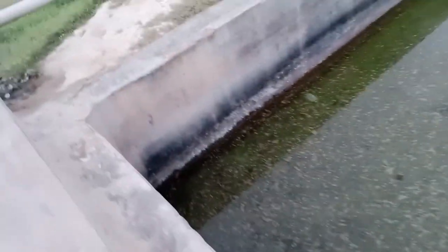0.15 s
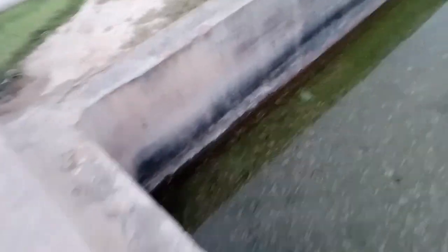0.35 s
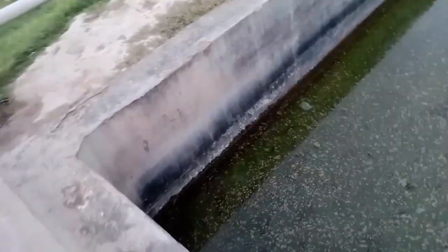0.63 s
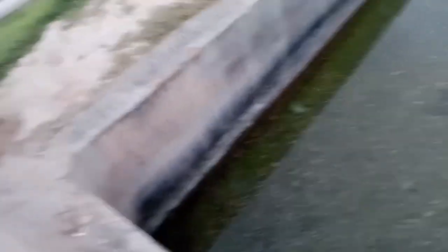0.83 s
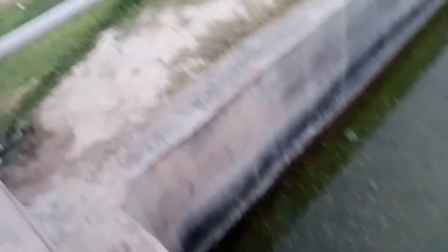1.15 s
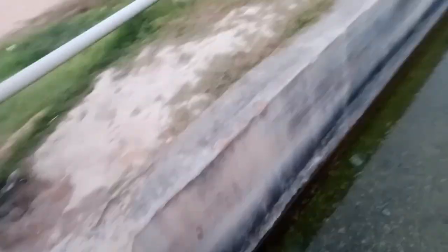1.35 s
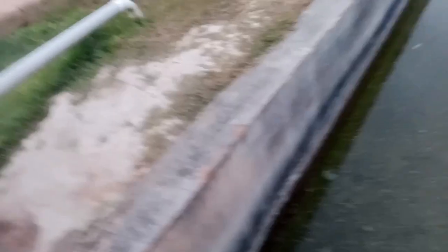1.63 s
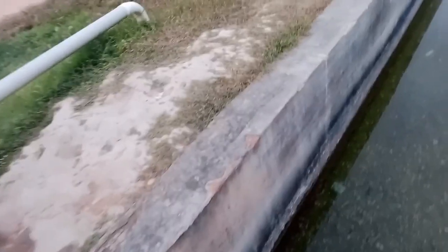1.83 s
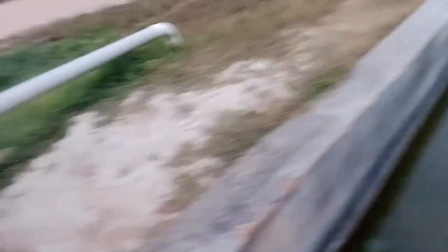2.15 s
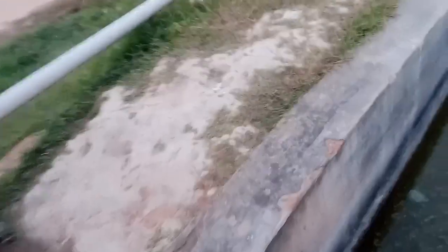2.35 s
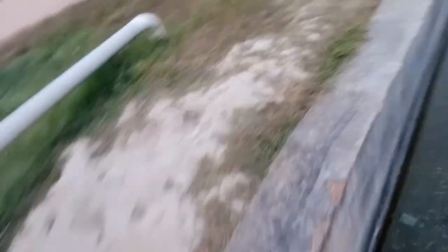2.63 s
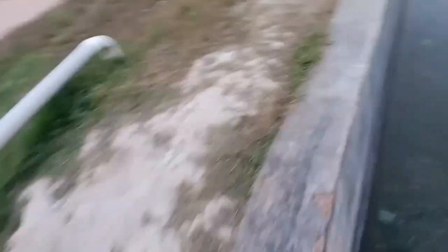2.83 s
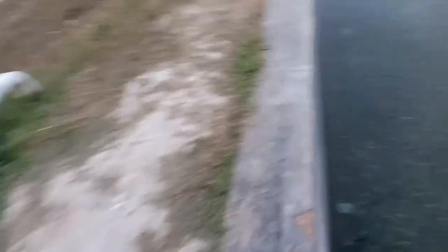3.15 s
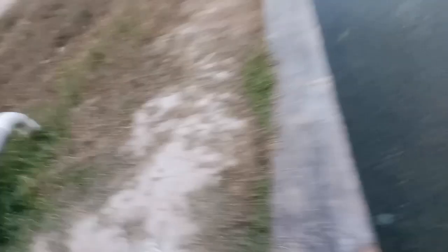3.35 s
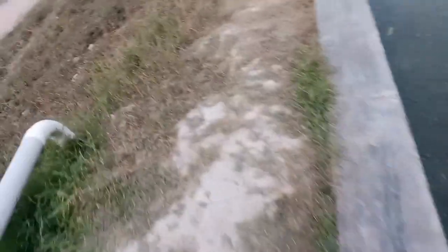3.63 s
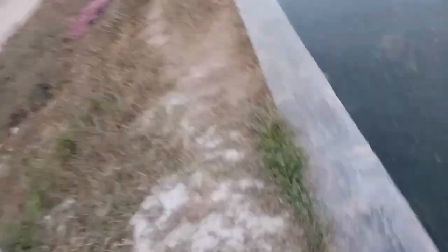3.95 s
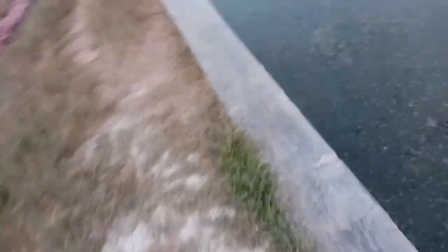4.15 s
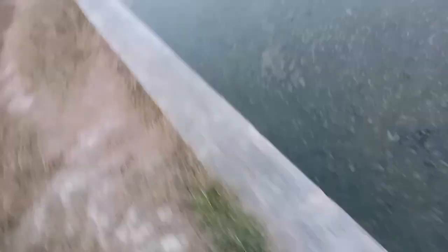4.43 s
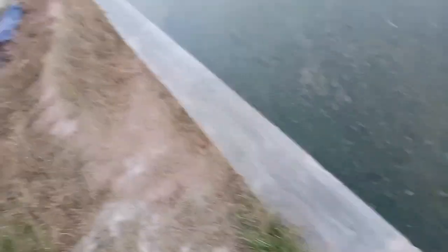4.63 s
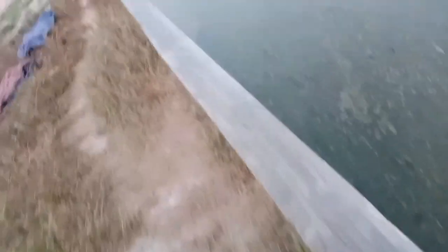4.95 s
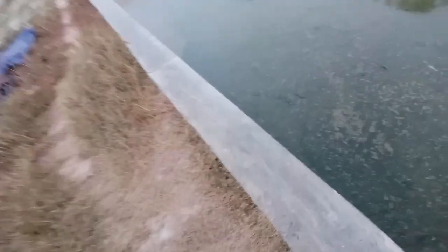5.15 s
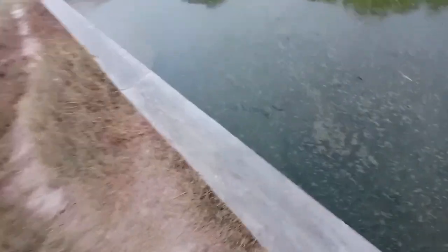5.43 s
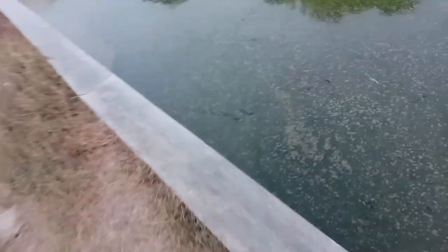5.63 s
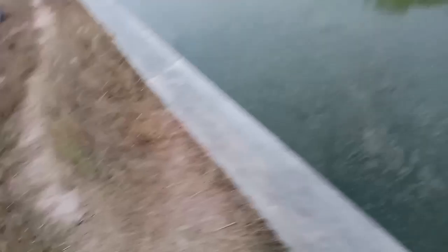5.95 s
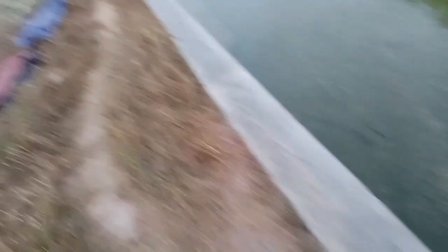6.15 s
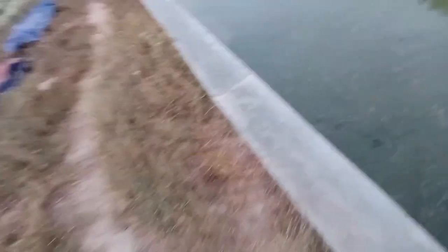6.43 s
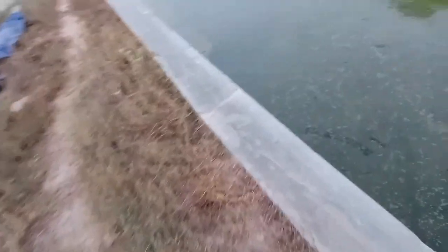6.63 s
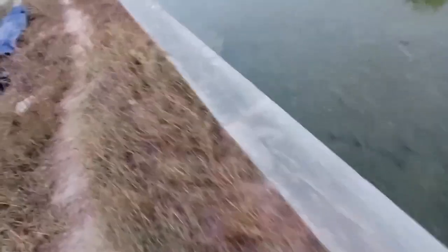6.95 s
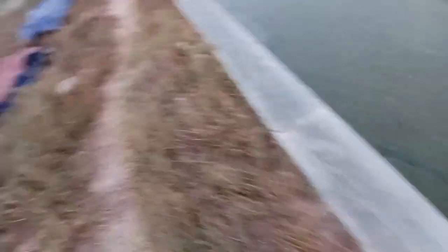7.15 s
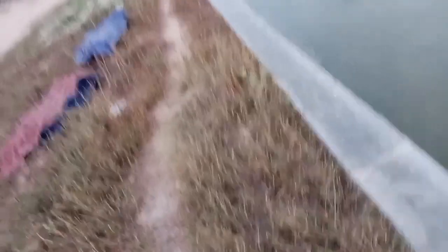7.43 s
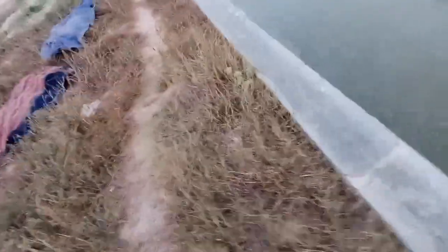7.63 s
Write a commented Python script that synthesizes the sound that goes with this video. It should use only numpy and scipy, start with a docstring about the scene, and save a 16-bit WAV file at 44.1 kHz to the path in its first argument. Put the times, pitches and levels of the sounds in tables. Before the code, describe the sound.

Outdoors by a concrete-edged farm pond, a dense flock of small birds chatters without pause. Water gurgles close by in hollow tones that rise in pitch, with low handling rubs and soft thumps. Near three seconds come sharp knocks, plops and harsh bird rasps. The handheld microphone then turns away, the water fades, and the quieter, duller flock goes on with single chirps, faint high pips and a brief trill.

```python
"""A dense flock of small birds chatters in the trees by a farm pond: many gliding notes, snips and noise wash.
At first water gurgles close by, bubbles and rush in resonances that rise as the microphone moves along a wall.
Rubs of filtered noise, soft ringing thumps and a few knocks come from the hand and the steps; water plops.
Nearer birds rasp, snip and whistle in swept tones. Then the microphone turns away and all grows quieter
and duller; a thin falling pip repeats, and one bird trills late on."""
import sys
import numpy as np
from scipy import signal
from scipy.fft import rfft, irfft, next_fast_len
from scipy.io import wavfile
from scipy.ndimage import map_coordinates

SR = 44100
rng = np.random.default_rng(int(sys.argv[2]) if len(sys.argv) > 2 else 0)


def materialize(psi):
    """Save the field psi as 16-bit PCM at rate SR to the path in sys.argv[1].

    A 1-D psi becomes a single channel; in a 2-D psi each row is a channel.
    """
    bounded = np.clip(np.atleast_2d(psi).T, -1, 1)
    quanta = np.round(bounded * 32767).astype(np.int16)
    wavfile.write(sys.argv[1], SR, quanta)


N = 343539  # length in samples


def amp(db):
    """Decibels to gain."""
    return 10 ** (np.asarray(db) / 20)


def unit(x):
    """Scale to rms 1."""
    return x / np.sqrt(np.mean(x ** 2) + 1e-20)


def curves(rows):
    """One value per sample for each column after the time."""
    s, *columns = np.transpose(rows)
    return [np.interp(np.arange(N) / SR, s, column) for column in columns]


def wobble(rate, size):
    """A smooth random curve through normal draws, rate knots a second."""
    knots = rng.standard_normal(int(size * rate / SR) + 4)
    return map_coordinates(knots, [np.arange(size) * rate / SR])


def coloured(x, points):
    """Filter x through a gain curve of (Hz, dB) points, straight over log frequency, and scale to rms 1."""
    size = next_fast_len(N + 8192)
    f, db = np.transpose(points)
    gain = amp(np.interp(np.log(np.fft.rfftfreq(size, 1 / SR) + 1), np.log(f), db))
    return unit(irfft(rfft(x, size) * gain, size)[:N])


def add(track, s, sound):
    """Mix a sound into the track at time s."""
    start = int(np.clip(round(s * SR), 0, N))
    track[start:start + len(sound)] += sound[:N - start]


def trees(x, t60, wet_db):
    """Trunks and leaves scatter a short diffuse tail: decaying noise convolved with the sound."""
    t = np.arange(SR // 2) / SR
    tail = rng.standard_normal(len(t)) * amp(-60 * t / t60)
    return x + amp(wet_db) * signal.fftconvolve(x, tail / np.linalg.norm(tail))[:N]


def chirp(length, start_hz, end_hz, rasp, buzz_hz=135, scatter_hz=260, overtone_db=-44):
    """One swept tone: a glide that flattens out; rasp breaks it into uneven pulses and shakes its pitch."""
    size = max(int(length * SR), 64)
    u = np.linspace(0, 1, size)
    rasp = np.clip(rasp, 0, 1)
    glide = end_hz + (start_hz - end_hz) * (1 - u) ** 1.5
    pitch = glide + rasp * scatter_hz * wobble(900, size)
    phase = 2 * np.pi * np.cumsum(pitch) / SR
    beat = 2 * np.pi * np.cumsum(buzz_hz * (1 + .3 * wobble(90, size))) / SR
    pulses = unit(amp(rasp * (7.6 * np.sin(beat) + 1.7 * wobble(150, size))))
    swell = np.sqrt(2) * np.abs(np.sin(np.pi * u))
    return swell * pulses * (np.sin(phase) + amp(overtone_db) * np.sin(2 * phase))


def crowd(low_hz, high_hz, length, fall, spread_db, count):
    """Many birds at many distances, each note with its own pitch, slope and rasp."""
    track = np.zeros(N)
    draws = np.hstack([rng.random((count, 3)), rng.standard_normal((count, 3))])
    for when, place, rasp, long, slope, near in draws:
        hz = low_hz + (high_hz - low_hz) * place
        glide = np.exp(fall + 0.0504 * slope)
        note = chirp(length * np.exp(.4 * long), hz * glide, hz / glide, rasp ** 2)
        add(track, when * N / SR, amp(spread_db * min(near, 1.7)) * note)
    return unit(track)


def grains(low_hz, high_hz, cycles, rise, spread_db, count):
    """A rain of tiny damped rings, a few much stronger than the rest."""
    when, place, size = rng.random((3, count, 1))
    hz = low_hz * (high_hz / low_hz) ** place
    k = np.arange(int(min(5 * cycles / low_hz, .04) * SR))
    age = k / SR * hz / cycles
    level = amp(spread_db * np.minimum(-np.log(size), 4))
    tone = np.sin(2 * np.pi * cycles * age * (1 + rise * age))
    rings = level * age * np.exp(-2 * age) * tone
    return unit(np.bincount(((when * N).astype(int) + k).ravel(), rings.ravel(), N)[:N])


def turned(start_s=2.82, end_s=4.5):
    """How far the microphone has turned away from the trees and the water, 0 to 1."""
    return np.clip((np.arange(N) / SR - start_s) / (end_s - start_s), 0, 1)


def chatter(low_hz, high_hz, snip_db, wash_db):
    """One register of the flock: short notes, falling whistles, dry snips and the blur of the farthest birds."""
    notes = crowd(low_hz, high_hz, length=.042, fall=.015, spread_db=2.5, count=1100)
    whistles = crowd(low_hz, high_hz, length=0.055, fall=.09, spread_db=3.0, count=45)
    voices = unit(trees(notes + 0.39 * whistles, t60=0.53, wet_db=-5.5))
    dry_snips = grains(low_hz, high_hz, cycles=6.1, rise=0, spread_db=3.5, count=4000)
    band = [(low_hz * 0.49, -30), (low_hz, 0), (high_hz, 0), (high_hz * 1.52, -30)]
    wash = coloured(rng.standard_normal(N), band)
    return voices + amp(snip_db) * dry_snips + amp(wash_db) * wash


def overtones(wash_db=4):
    """The overtones of the voices: faint high notes in a fine, gritty fizz."""
    # The tilt of the overtones. Each row: frequency in Hz, relative gain in dB.
    tilt = [(3500, -35), (4600, 3.5), (5000, -3.5), (5480, -3), (5950, -7), (6400, -4.5), (7000, -11.5),
            (7900, -24), (11000, -49)]
    notes = crowd(5200, 6700, length=0.056, fall=0, spread_db=2.5, count=420)
    grit = grains(4600, 7600, cycles=17, rise=0, spread_db=4, count=5000)
    return coloured(notes + grit + amp(wash_db) * rng.standard_normal(N), tilt)


def wall(x):
    """A close echo off the concrete wall combs the sound; a shorter path moves the peaks up."""
    # The echo on its way. Each row: time in seconds, delay in ms, strength from 0 to 1.
    echo_path = [(0, 1.34, 0), (1.0, 1.46, 0.17), (2.0, 1.23, 0.23), (2.8, 1.11, 0.22), (3.6, 1.153, 0.09),
                 (7.79, 0.87, 0)]
    delay_ms, strength = curves(echo_path)
    echo = map_coordinates(x, [np.arange(N) - delay_ms * SR / 1000], order=1)
    return x + strength * echo


def flock():
    """Low and high voices swell separately; their faint overtones follow both and are shaded off by the turn."""
    # The swell of the chorus. Each row: time in seconds, low and high voices in dB before trim and wobble.
    swell = [(0, -42, -45), (.6, -44, -47.5), (1.1, -45, -50), (1.8, -46, -50.5), (2.0, -44.5, -45.5),
             (2.3, -46.5, -49), (2.75, -49, -41), (3.03, -50, -45), (3.3, -51, -49.5), (3.8, -49, -54.5),
             (4.15, -56.5, -59.5), (5.1, -53, -55.5), (6.7, -57.5, -58), (7.0, -58.5, -61),
             (7.79, -57, -57)]
    # The tone of the voices. Each row: frequency in Hz, relative gain in dB.
    voice_tone = [(1400, -41.5), (1780, -20), (1980, -5.5), (2300, 0.5), (2700, 2.5), (3300, 1.5),
                  (3900, -2), (4330, -6), (4600, -20.5), (5000, -24.5), (6500, -56)]
    # Short lulls in the chorus. Each row: centre in seconds, half-width in seconds, depth in dB.
    lulls = [(0.133, 0.023, -4), (5.837, 0.032, -5), (6.104, 0.027, -5)]
    overtone_db, shade_db = -20, -10.5  # against the mean of the voice levels; further loss with the turn
    low_db, high_db = curves(swell)
    low_voices = coloured(chatter(1750, 3200, snip_db=-1, wash_db=-2.5), voice_tone)
    high_voices = coloured(chatter(3200, 4800, snip_db=-4, wash_db=-4.0), voice_tone)
    low = amp(low_db - 1.5 + .5 * wobble(7, N)) * low_voices
    high = amp(high_db - 0.5 + 0.76 * wobble(7, N)) * high_voices
    over_db = (low_db + high_db) / 2 + overtone_db + shade_db * turned()
    over = amp(over_db + .8 * wobble(6, N)) * overtones()
    t = np.arange(N) / SR
    lull_db = sum(db * np.exp(-((t - s) / length) ** 2) for s, length, db in lulls)
    return wall(amp(lull_db) * (low + high + over))


def hollow(centre_hz, width_hz, rush_db):
    """Bubbles and rush heard through one resonance that may glide, with the level surging at random."""
    bubbles = grains(349.1, 2197, cycles=13.9, rise=0.018, spread_db=4.0, count=2600)
    rush = amp(rush_db) * rng.standard_normal(N)
    f, t, z = signal.stft(bubbles + rush, SR, nperseg=1024)
    centre = np.interp(t, np.arange(N) / SR, centre_hz)
    gain = 1 / (1 + ((f[:, None] - centre) / width_hz) ** 2)
    resonant = signal.istft(z * gain, SR, nperseg=1024)[1][:N]
    return unit(amp(1.7 * wobble(14, N)) * resonant)


def gulp(length, hz, swirl_rate=150):
    """A cluster of like-sized bubbles: a brief swell of a wavering hollow tone (swirl in knots a second)."""
    size = int(length * SR)
    swirl = wobble(swirl_rate, size) + 1j * wobble(swirl_rate, size)
    tone = unit(np.real(swirl * np.exp(2j * np.pi * hz * np.arange(size) / SR)))
    return np.sqrt(2) * np.sin(np.linspace(0, np.pi, size)) * tone


def water():
    """The gurgle, with a few single gulps, fades as the microphone leaves it behind."""
    # Running water. Each row: time in seconds, lower resonance in dB, middle resonance in dB.
    gurgle = [(0, -61.5, -66.5), (.65, -58.5, -64), (1.35, -61, -61), (1.8, -62, -54.5), (2.15, -61, -58),
              (2.4, -60.5, -48), (2.62, -56.5, -51), (2.88, -52, -57), (3.05, -56.5, -60.5),
              (3.6, -65.5, -72), (4.2, -67, -81), (4.7, -87.5, -82), (7.79, -94, -100)]
    # Its hollow tone on the move. Each row: time in seconds, lower and middle resonance in Hz.
    hollow_tone = [(0, 486, 1240), (.6, 552, 1280), (1.2, 508, 1220), (2.0, 663, 1440), (2.45, 706, 1500),
                   (2.8, 840, 1576), (3.3, 1032, 1980), (4.2, 1430, 2300)]
    # Fixed resonances, dying with distance. Each row: Hz, width in Hz, starting level in dB, fade in dB per s.
    basin = [(560, 100, -63.5, -2.6), (1900, 170, -53, -4)]
    # Single gulps. Each row: start in seconds, length in seconds, pitch in Hz, level in dB.
    gulps = [(0.563, 0.2, 582, -55), (1.194, 0.049, 1295, -54), (1.591, .11, 1400, -53.5),
             (1.852, 0.069, 609, -56.5), (1.967, .08, 603, -53.5), (2.255, 0.13, 1620, -53),
             (2.776, 0.046, 858, -51), (4.111, 0.12, 550, -66)]
    lower_db, middle_db = curves(gurgle)
    lower_hz, middle_hz = curves(hollow_tone)
    track = amp(lower_db) * hollow(lower_hz, width_hz=135, rush_db=9.5)
    track += amp(middle_db) * hollow(middle_hz, width_hz=147, rush_db=6)
    for hz, width_hz, db, fade in basin:
        level = amp(db + fade * np.arange(N) / SR)
        track += level * hollow(np.full(N, hz), width_hz, rush_db=7.5)
    for s, length, hz, db in gulps:
        add(track, s, amp(db) * gulp(length, hz))
    return track


def air():
    """A low outdoor murmur and a faint hiss, both noise of wavering level; both drop with the turn."""
    # The tone of the murmur. Each row: frequency in Hz, relative gain in dB.
    murmur_tone = [(25, -36.5), (45, -14.5), (70, -5.5), (150, 2.5), (220, 1), (330, 0.5), (700, -4.5),
                   (1300, -5.5), (1900, -7), (4000, -10), (8000, -38.5)]
    # The tone of the hiss. Each row: frequency in Hz, relative gain in dB.
    hiss_tone = [(3000, -19), (6000, -5.5), (9300, 3.5), (11000, -1.5), (13700, -3.5), (14800, 13),
                 (15800, 7)]
    away = turned()
    fade_db = -1.09 * np.arange(N) / SR  # a steady fade of the murmur, dB
    murmur_db = -60 - 1 * away + fade_db + 2.16 * wobble(9, N)
    hiss_db = -81 - 13 * away + .9 * wobble(8, N)
    murmur = amp(murmur_db) * coloured(rng.standard_normal(N), murmur_tone)
    hiss = amp(hiss_db) * coloured(rng.standard_normal(N), hiss_tone)
    return murmur + hiss


def grip():
    """Each shift of the hand swells, holds and dies away over a faint resting rumble."""
    # Rubs of the hand on the case. Each row: start in seconds, length in seconds, rumble in dB.
    rubs = [(0.018, 0.097, -64), (0.337, 0.36, -58), (0.976, 0.038, -56), (1.09, .15, -65.5),
            (1.304, 0.03, -49), (1.404, .09, -64), (1.59, 0.049, -69), (1.91, 0.14, -57.5),
            (2.07, 0.087, -54.5), (2.71, .11, -62), (2.875, .13, -67), (3.068, 0.11, -64),
            (5.08, 0.054, -71), (5.778, 0.048, -62.5), (6.278, .05, -73), (7.147, 0.28, -81)]
    # The tone of the rumble. Each row: frequency in Hz, relative gain in dB.
    rumble_tone = [(25, -46.5), (36, -19.5), (52, -1.5), (100, -5.5), (170, -13), (400, -31.5), (900, -83)]
    attack_s, release_s, resting_db = 0.019, .02, -82  # the release runs this long either side of the end
    t = np.arange(N) / SR
    level = amp(resting_db + 2.5 * wobble(8, N))
    for s, length, db in rubs:
        corners = [s, s + attack_s, s + length - release_s, s + length + release_s]
        level = level + amp(db) * np.interp(t, corners, [0, 1, 1, 0])
    return level * coloured(rng.standard_normal(N), rumble_tone)


def scold(length, hz, buzz_hz=125, depth_db=5.0):
    """A harsh rattle: uneven puffs of noise through the throat's resonances."""
    # The scolding throat. Each row: frequency as a multiple of the pitch, width in Hz, gain in dB.
    resonances = [(.72, 900, -11), (0.999, 547, 2.5), (1.13, 400, -13), (1.4, 330, -29), (1.63, 380, -33.5)]
    size = int(length * SR)
    beat = 2 * np.pi * np.cumsum(buzz_hz * (1 + 0.3 * wobble(70, size))) / SR
    puffs = rng.standard_normal(size) * amp(depth_db * np.sin(beat))
    f = np.fft.rfftfreq(size, 1 / SR)
    throat = np.zeros(len(f))
    for ratio, width, db in resonances:
        if ratio * hz < 7000:
            throat += amp(db) / (1 + (2 * (f - ratio * hz) / width) ** 4)
    rattle = unit(irfft(rfft(puffs) * throat, size))
    return np.sqrt(2) * np.sin(np.linspace(0, np.pi, size)) * rattle


def scolds():
    """Harsh scolding rasps, and short bursts of their overtones near 5.4 kHz."""
    # Each row: start in seconds, length in seconds, pitch in Hz, level in dB.
    scold_bursts = [(0.034, 0.11, 5480, -66), (0.209, 0.095, 5500, -65.5), (1.084, .092, 5480, -64),
                    (2.725, 0.027, 5500, -57), (2.759, 0.24, 3800, -48.5), (2.92, 0.19, 3840, -45.5),
                    (3.061, .22, 3740, -49.5), (3.851, .11, 3890, -49.5), (7.238, .195, 3880, -47.5),
                    (7.674, 0.071, 3980, -58), (7.67, 0.096, 5400, -81)]
    track = np.zeros(N)
    for s, length, hz, db in scold_bursts:
        add(track, s, amp(db) * scold(length, hz))
    return track


def snips():
    """Dry snips in the chatter: tiny tones of shaken phase under a pulse that peaks after 2.2 ms."""
    # Each row: time in seconds (the sound starts 1 ms earlier), envelope peak in dB, pitch in Hz.
    snip_calls = [(.405, -34, 3100), (0.461, -33.5, 3290), (0.584, -29.5, 2730), (1.8234, -29, 3050),
                  (1.833, -34, 3780), (2.3908, -39, 3780), (2.6687, -35.5, 4450), (2.81, -29.5, 3880),
                  (2.9013, -30, 3650), (2.9978, -25.5, 3810), (3.1214, -31, 3640), (3.446, -37.5, 2390),
                  (4.0924, -39.5, 2710), (4.5436, -40.5, 3700), (7.343, -34.5, 3730)]
    track = np.zeros(N)
    t = np.arange(SR // 40) / SR
    age = t / .0022
    pulse = (age * np.exp(1 - age)) ** 2
    for s, db, hz in snip_calls:
        tone = np.sin(2 * np.pi * hz * t + .6 * wobble(800, len(t)))
        add(track, s - .001, amp(db) * pulse * tone)
    return track


def thumps_and_plops():
    """Soft thumps and watery plops: damped tones with a rounded onset and shaken phase."""
    # Each row: start in seconds, level in dB before the onset softens it, pitch in Hz, t60 in seconds.
    soft_hits = [(.435, -39, 60, 0.11), (1.31, -43.5, 69.6, 0.2), (1.961, -43.5, 318, 0.14),
                 (1.915, -45, 80, .08), (2.112, -31, 149, 0.05), (2.33, -43, 369, 0.1),
                 (2.728, -40.5, 153, 0.11), (2.731, -36.5, 272, 0.056), (2.745, -42.5, 359, 0.19),
                 (2.748, -40.5, 526, 0.11), (2.921, -25.5, 862, 0.025), (3.552, -38, 356, .08),
                 (3.825, -41.5, 360, 0.054), (5.79, -45, 141, 0.045)]
    track = np.zeros(N)
    t = np.arange(SR // 5) / SR
    onset = 1 - np.exp(-t / 0.0021)
    for s, db, hz, t60 in soft_hits:
        ring = np.sin(2 * np.pi * hz * t + .6 * wobble(hz / 3, len(t)))
        add(track, s, amp(db) * onset * amp(-60 * t / t60) * ring)
    return track


def calls():
    """Nearer birds whistle and rasp in swept tones; some rows are partials of one call."""
    # Each row: start in seconds, length in seconds, start Hz, end Hz, level in dB, rasp from 0 to 1.
    swept_tones = [ (0.49, 0.019, 2275, 2174, -43, 0.2), (.518, 0.038, 2750, 2610, -41.5, 0.07),
                   (.575, 0.079, 2800, 2800, -44, .64), (0.738, 0.1, 2767, 2690, -41.5, 0.8),
                   (1.122, 0.027, 4700, 4580, -50, 0.2), (1.226, .13, 3850, 4000, -51, 0.3),
                   (1.358, .18, 4240, 4460, -56.5, 0.42), (1.83, .02, 3870, 3900, -45, 0.4),
                   (1.821, 0.042, 4540, 4490, -49.5, .3), (1.941, 0.016, 3180, 3140, -40.5, 0),
                   (2.034, 0.16, 4100, 3785, -47.5, 0.36), (2.135, 0.017, 3270, 3370, -39, .3),
                   (2.288, 0.064, 3765, 3400, -41, 0.38), (2.46, 0.17, 4380, 4560, -54.5, 0.36),
                   (2.65, 0.065, 4600, 4680, -54, 0.27), (3.348, 0.058, 2340, 2280, -47.5, 0.4),
                   (3.533, .05, 4480, 3640, -51, .2), (3.57, 0.031, 2614, 2480, -46, 0.17),
                   (3.726, 0.08, 2540, 2890, -51, .66), (4.238, 0.054, 4280, 3470, -51.5, 0.4),
                   (4.261, .065, 3300, 2250, -52, .2), (4.316, 0.054, 2230, 2186, -44.5, 0.11),
                   (4.559, 0.036, 3830, 3510, -48, 0.42), (4.623, 0.088, 2930, 2620, -51.5, 0.77),
                   (5.049, 0.036, 5600, 5440, -72, .5), (5.138, .025, 6600, 6450, -70, 0.2),
                   (5.142, 0.047, 5880, 5850, -70, 0.4), (5.148, .031, 5200, 5100, -63, 0.2),
                   (5.167, .031, 4500, 4450, -55, 0.06), (5.456, 0.028, 3570, 3510, -49, .2),
                   (5.459, 0.068, 3000, 2930, -48.5, 0.23), (5.516, .042, 3150, 3750, -48.5, 0.5),
                   (5.948, 0.031, 4300, 4450, -58, 0.15), (6.028, 0.038, 3090, 2990, -49.5, 0.93),
                   (6.139, 0.03, 3870, 3810, -49.5, 0.55), (6.205, 0.086, 2550, 2600, -54.5, 0.53),
                   (6.674, 0.13, 4000, 3200, -54.5, 0.82), (6.807, 0.082, 2400, 2230, -59, 0.1),
                   (7.681, 0.059, 1183, 1158, -62, .12), (7.725, 0.029, 4450, 4400, -59, .3)]
    track = np.zeros(N)
    for s, length, start_hz, end_hz, db, rasp in swept_tones:
        add(track, s, amp(db) * chirp(length, start_hz, end_hz, rasp))
    return track


def knocks():
    """Sharp knocks on the case: one push and a brief rattle, band-limited, with a bright contact tick."""
    # Each row: start in seconds, peak of the body in dB, brightness in Hz, lowest tone in Hz,
    # gain of the contact tick in dB before the knock's own level.
    case_knocks = [(2.718, -22.5, 2980, 300, -23), (2.7322, -22, 2400, 120, -6.5),
                   (6.0442, -31.5, 806, 150, -2.5)]
    track = np.zeros(N)
    t = np.arange(SR // 5) / SR
    for s, db, bright_hz, low_hz, tick_db in case_knocks:
        rattle = 0.02 * rng.standard_normal(len(t)) * amp(-60 * t / 0.066)
        blow = (t == 0) + rattle
        body = signal.lfilter(*signal.butter(2, [low_hz, bright_hz], 'band', fs=SR), blow)
        body = signal.lfilter(*signal.butter(N=6, Wn=5300, fs=SR), body)  # the case dulls the top
        tick = signal.lfilter(*signal.butter(1, [4700, 7000], 'band', fs=SR), blow)
        add(track, s, amp(db) * (body / np.abs(body).max() + amp(tick_db) * tick))
    return track


def pips(length=0.031):
    """A very high, short falling note, repeated almost evenly."""
    # Each row: centre in seconds, peak in dB.
    pip_calls = [(3.312, -70), (3.7, -88), (4.108, -70.5), (4.498, -73.5), (4.89, -69.5), (5.284, -74),
                 (5.68, -74), (6.072, -76), (6.488, -69.5), (6.883, -73), (7.275, -70.5), (7.67, -82)]
    track = np.zeros(N)
    u = np.linspace(0, 1, int(length * SR))
    for s, db in pip_calls:
        pitch = 8130 - 430 * u ** 2 + rng.normal(0, 35)
        tone = np.sin(2 * np.pi * np.cumsum(pitch) / SR)
        add(track, s - length / 2, amp(db) * np.sin(np.pi * u) ** 2 * tone)
    return track


def trill(start_s=5.402, gap_s=.0142, stroke_s=.011, hz=3520, db=-44, count=5):
    """One bird's quick, even run of short strokes around one pitch; gap_s runs from onset to onset."""
    track = np.zeros(N)
    for k in range(count):
        add(track, start_s + k * gap_s, amp(db) * chirp(stroke_s, hz, hz, rasp=0.57))
    return track


def near_birds():
    """Scolds, snips, whistles and a trill stand out of the chorus, with a light tail from the trees."""
    return trees(scolds() + snips() + calls() + trill(), t60=0.3, wet_db=-12)


def handling_and_plops():
    """Rumble of the grip, soft thumps, watery plops and sharp knocks."""
    return grip() + thumps_and_plops() + knocks()


def scene():
    """Everything at one microphone."""
    return (flock() + water() + air() + handling_and_plops() + near_birds() + pips())[None]


def record(dry, top_hz=15800):
    """Nothing is kept from the band limit up."""
    return irfft(rfft(dry) * (np.fft.rfftfreq(N, 1 / SR) < top_hz), N)


dry = scene()
out = record(dry)
materialize(out)
```